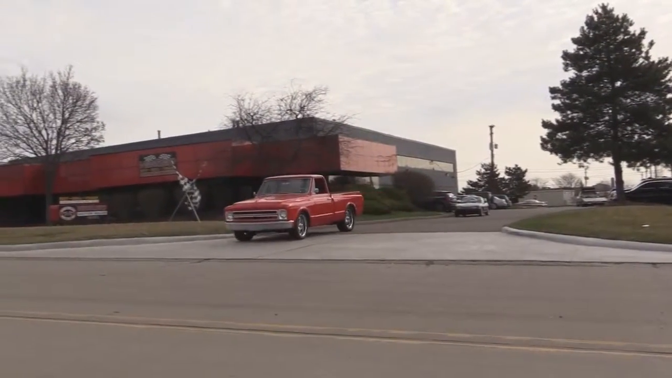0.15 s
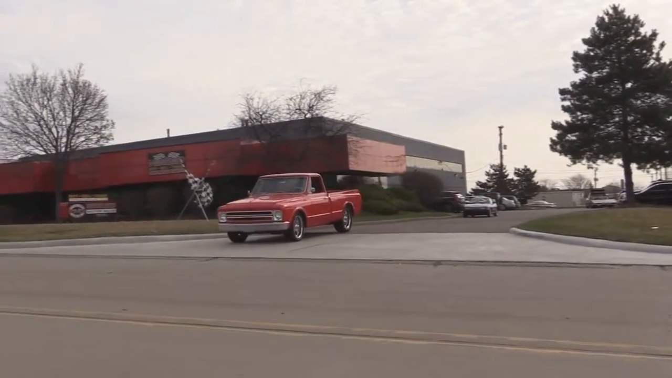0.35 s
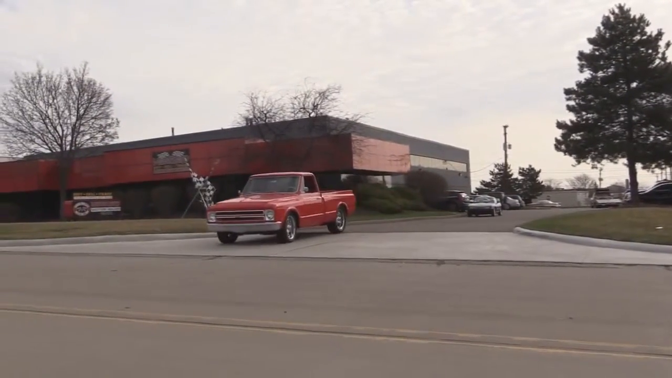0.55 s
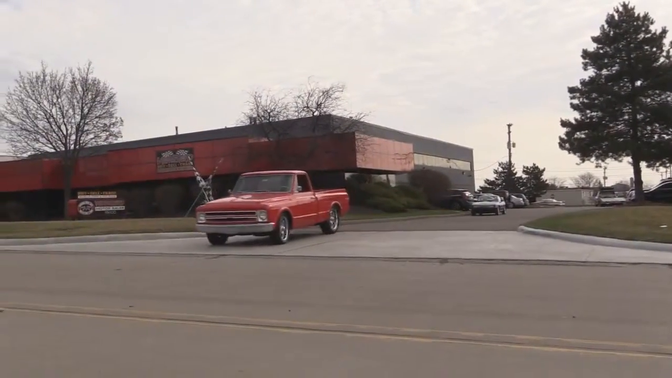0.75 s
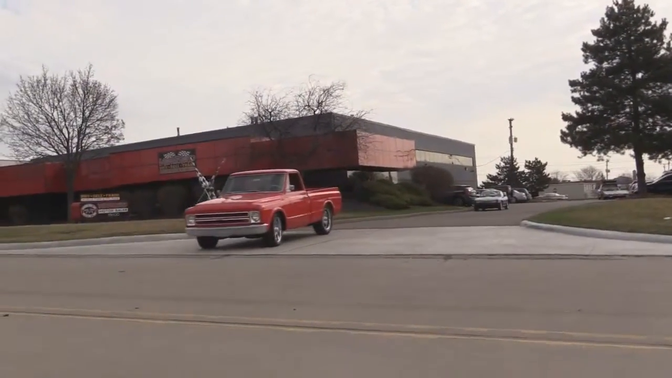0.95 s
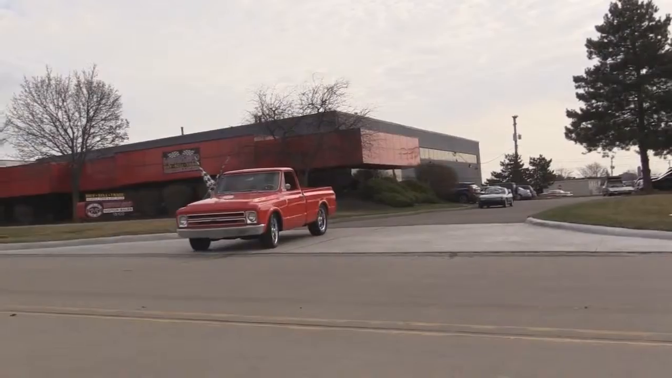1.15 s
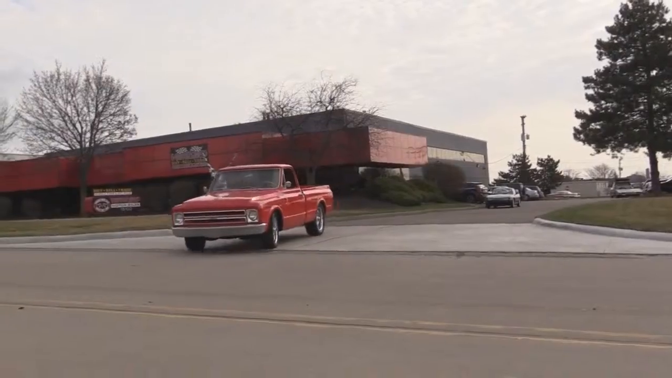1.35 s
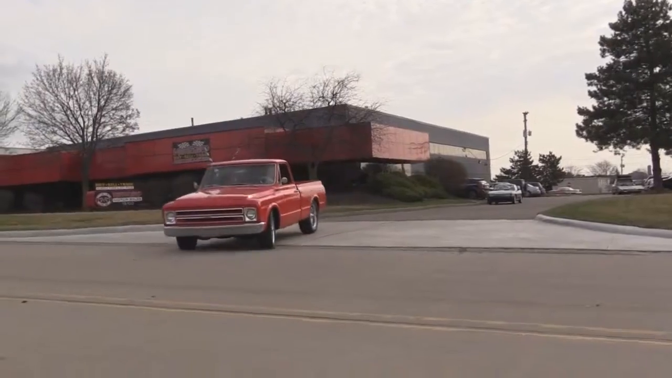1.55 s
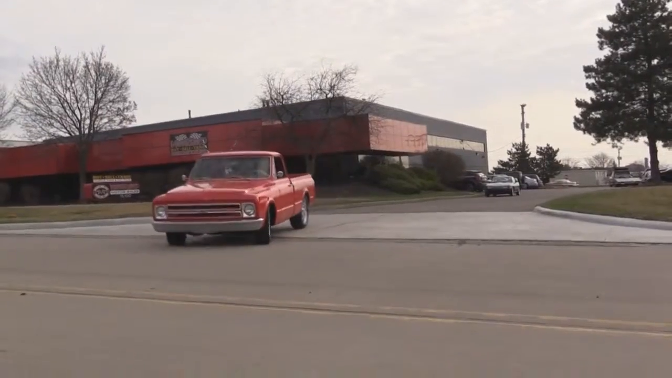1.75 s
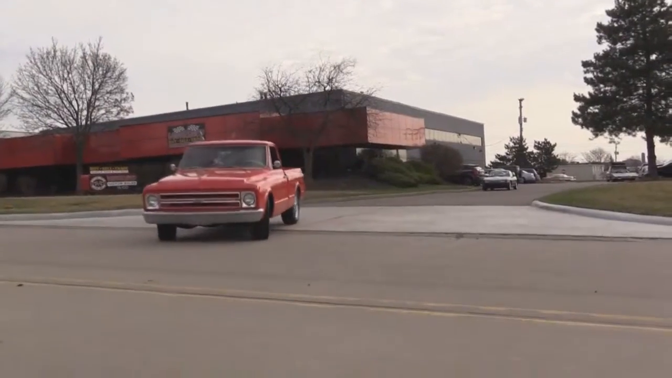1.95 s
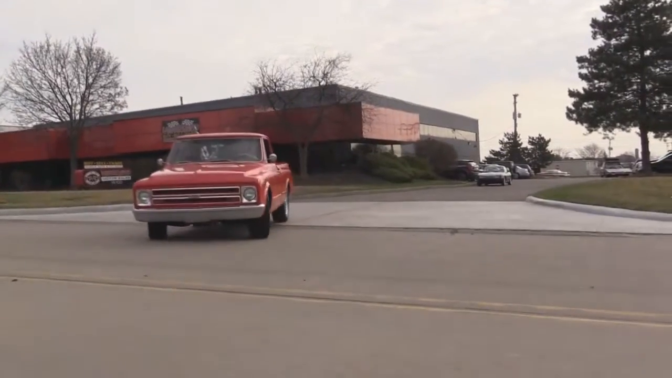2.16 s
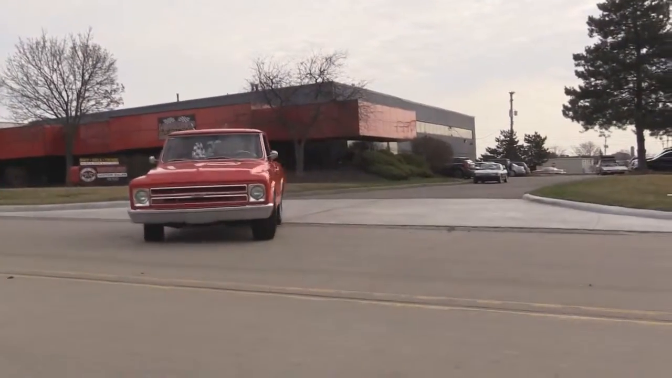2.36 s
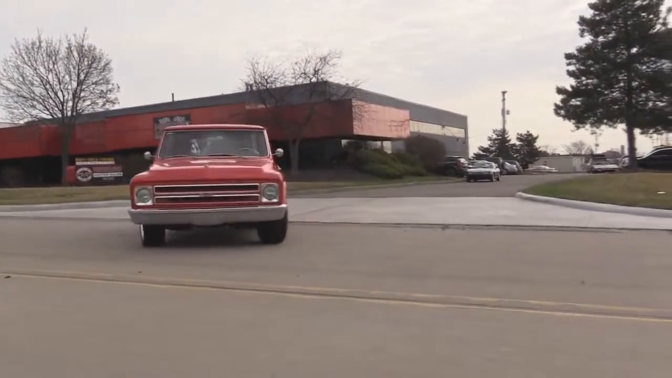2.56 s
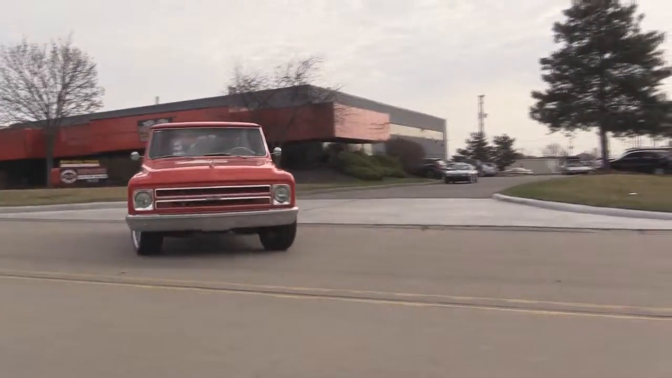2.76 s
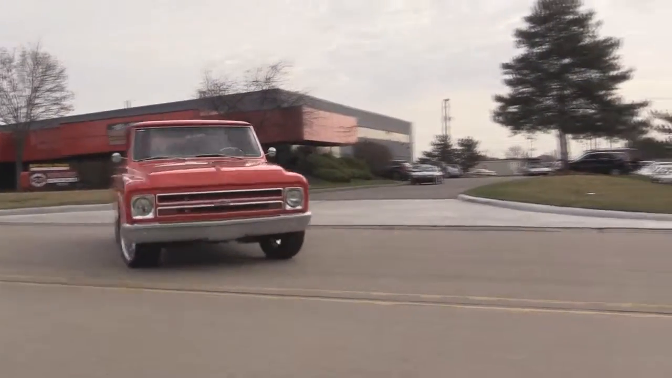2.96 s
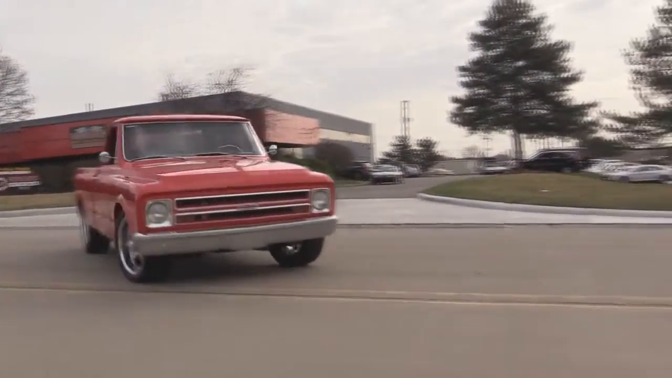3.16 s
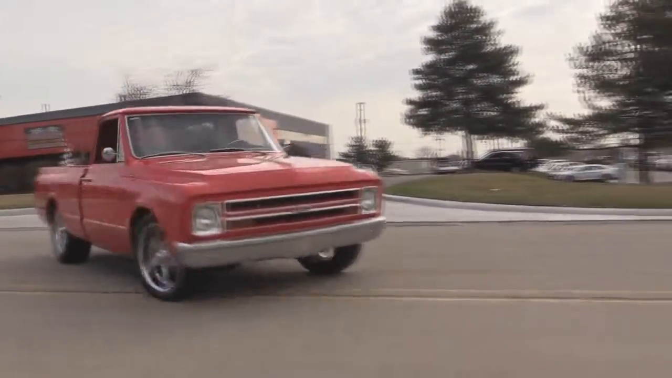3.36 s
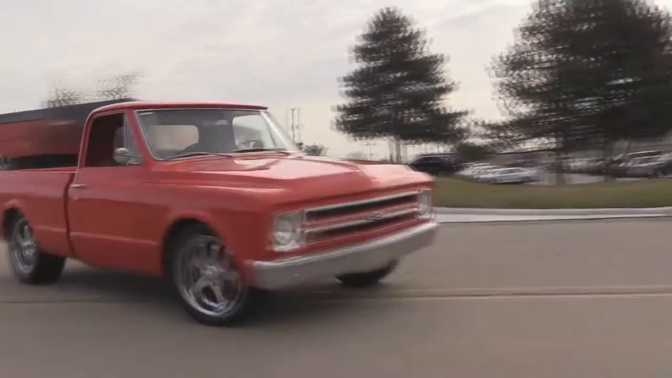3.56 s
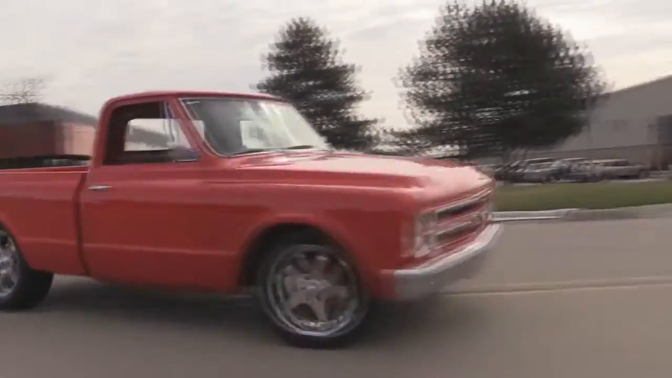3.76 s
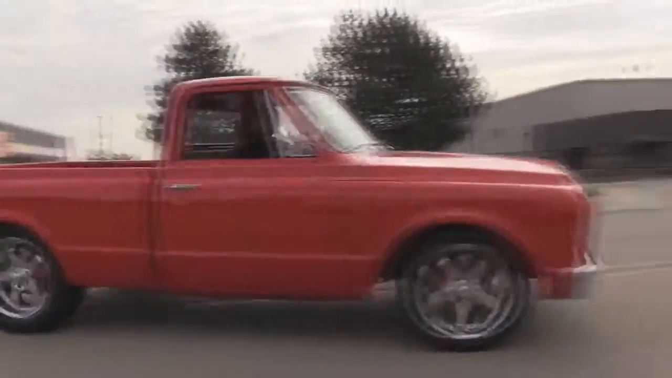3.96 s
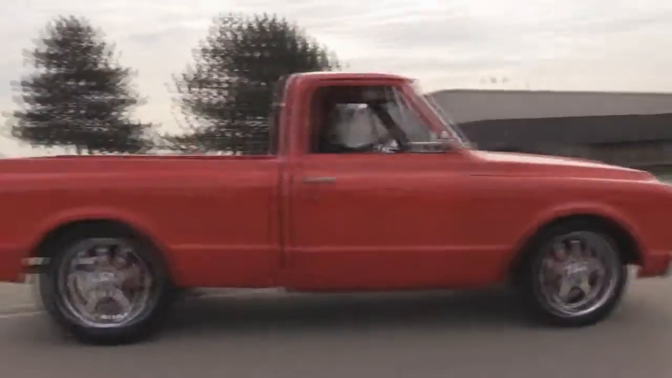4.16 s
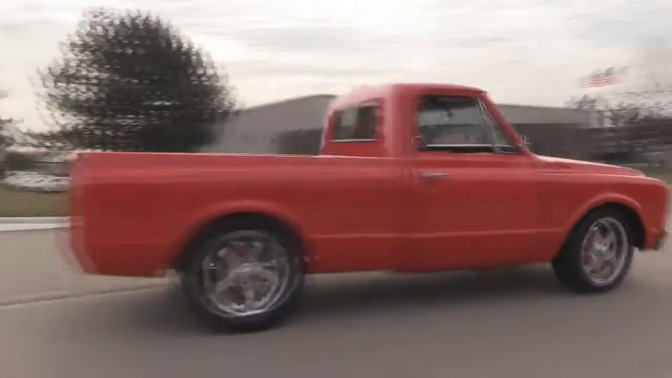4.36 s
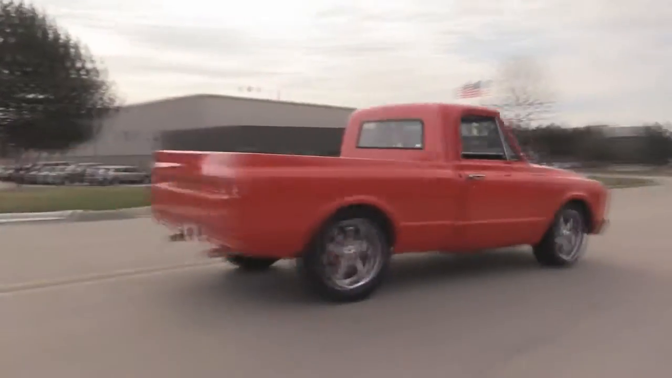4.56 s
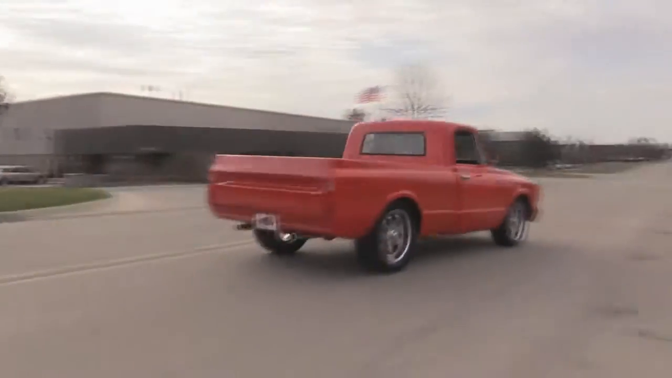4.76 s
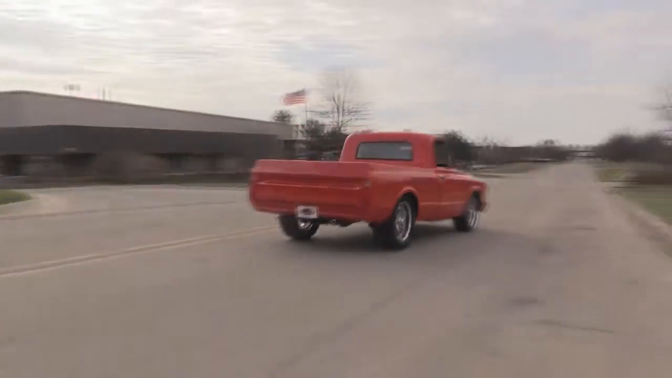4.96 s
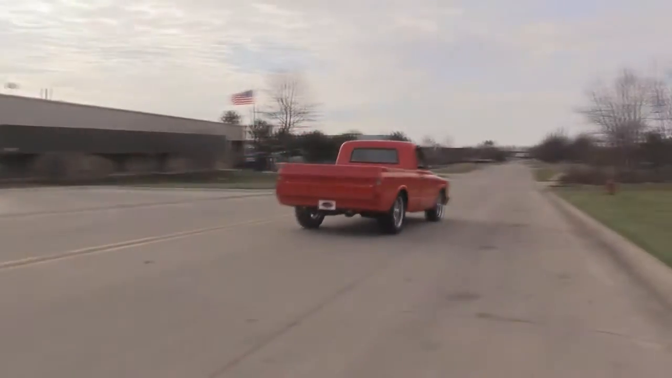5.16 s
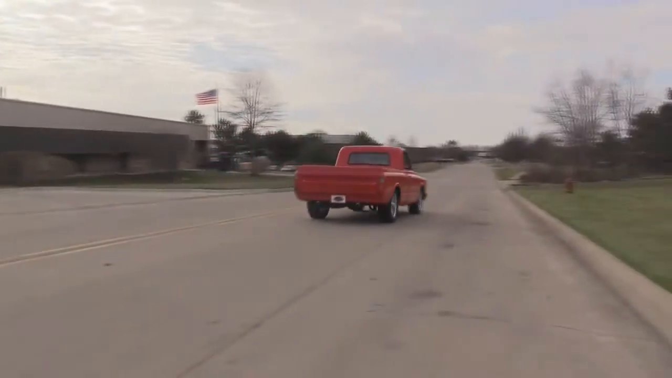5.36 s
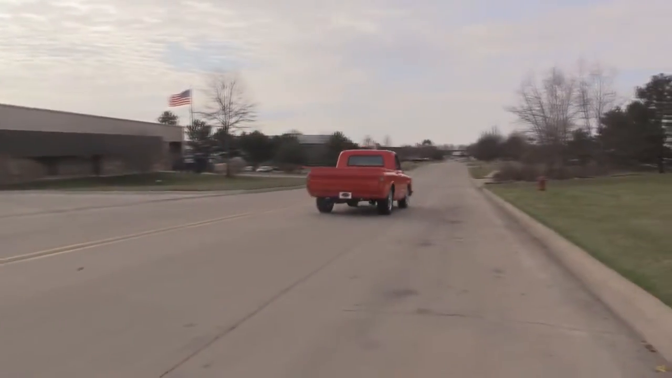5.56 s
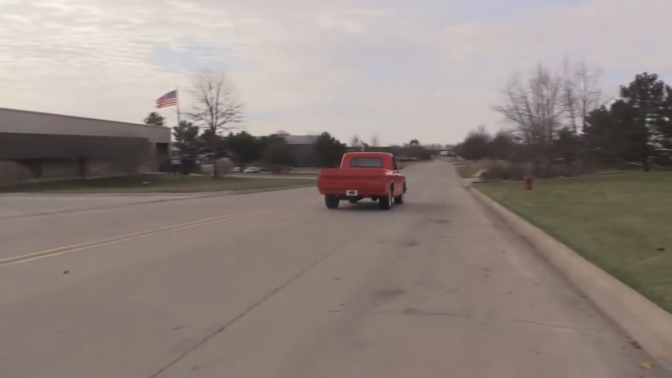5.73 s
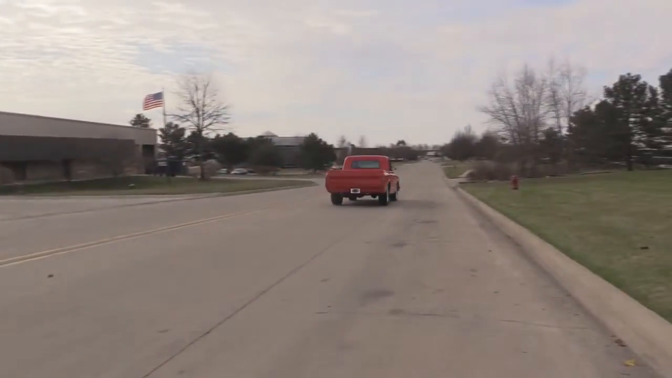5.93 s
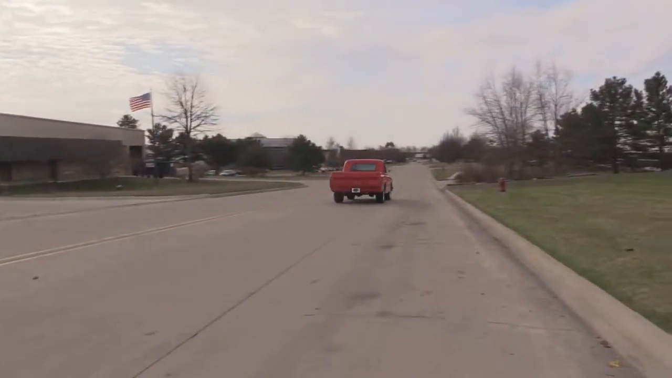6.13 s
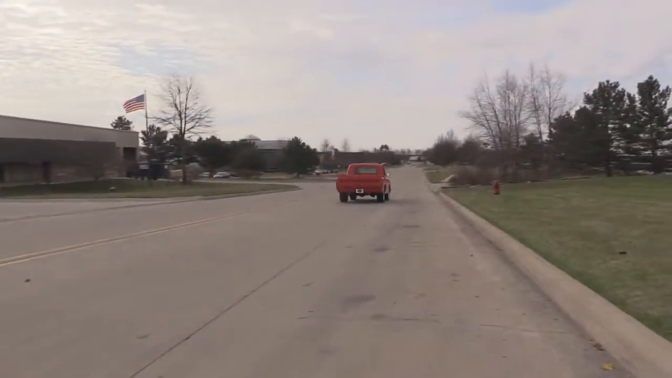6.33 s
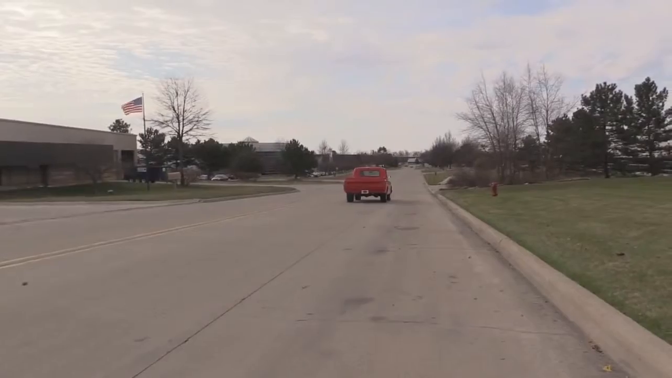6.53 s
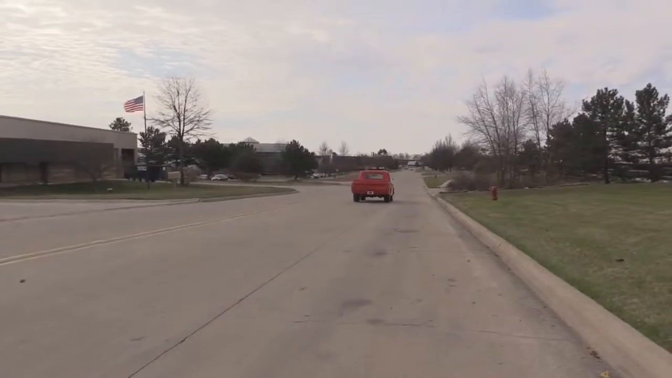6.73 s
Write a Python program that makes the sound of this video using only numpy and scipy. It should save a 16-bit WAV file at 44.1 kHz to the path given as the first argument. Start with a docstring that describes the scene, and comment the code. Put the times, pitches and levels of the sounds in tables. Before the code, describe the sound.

Outdoors beside a wide road, an old V8 pickup rolls out quietly with a low, uneven burble under light wind. The throttle opens, the exhaust deepens and grows, then the engine climbs sharply as the truck sweeps close past the fixed roadside microphone. Rasp and hiss burst from the dual pipes, the pitch drops at an upshift with dry crackles, and the throaty drone recedes down the road.

```python
"""At the edge of a driveway: an old V8 pickup rolls out, opens up, kicks down as it passes, shifts up and leaves.
Its exhaust is a set of notes that follow the engine, mixed with uneven strokes and puffs of noise from two pipes.
Short bursts, ringing pipe tips and single cracks make the rasp; filtered noise makes the rush, hiss and intake.
Sine waves make the whine of the belt-driven parts and a distant bird; low noise makes wind and a faint town.
Engine load, distance and the angle of the pipes set how loud the main voices are."""
import sys
import numpy as np
from scipy import signal
from scipy.fft import rfft, irfft
from scipy.io import wavfile
from scipy.ndimage import uniform_filter1d

SR = 44100
rng = np.random.default_rng(int(sys.argv[2]) if len(sys.argv) > 2 else 0)


def transcribe(signal):
    """Save signal, clipped to [-1, 1], as a 16-bit WAV file at the path in sys.argv[1]."""
    frames = np.atleast_2d(signal).T
    limited = np.clip(frames, -1, 1)
    pcm = np.round(limited * 32767).astype(np.int16)
    wavfile.write(sys.argv[1], SR, pcm)


N = 303839
TIME = np.arange(N) / SR   # seconds

# engine speed: creeping, a blip, kick-down, upshift, easing off: (time [s], speed [firings per s])
ENGINE_SPEED = [(0.0, 103.5), (0.46, 103.6), (0.85, 111.1), (1.25, 115.9), (1.6, 119.0), (1.85, 118.9),
                (2.2, 119.6), (2.34, 130.8), (2.48, 108.8), (2.65, 112.2), (2.97, 111.9), (3.3, 119.8),
                (3.58, 124.7), (3.75, 144.4), (3.95, 147.4), (4.2, 157.0), (4.45, 167.4), (4.69, 176.5),
                (4.9, 178.6), (5.02, 160.1), (5.13, 142.6), (5.35, 135.5), (5.8, 138.8), (6.29, 142.1),
                (6.5, 138.7), (6.7, 132.9), (6.89, 131.4)]
# engine load: (time [s], share of full load [0-1])
ENGINE_LOAD = [(0, 0), (.98, 0.13), (2.25, 0.21), (2.5, 0.58), (3.05, 0.67), (3.52, 0.75), (3.7, 0.88),
               (4.83, 0.95), (5.09, 0.85), (5.41, 0.79), (6.38, 0.7), (6.55, 0.66), (6.89, 0.63)]
# tailpipe of each cylinder in firing order: 0 near, 1 far
PIPE_OF_CYLINDER = [0, 1, 1, 0, 1, 0, 0, 1]
# cylinders in firing order: (strength before the unevenness factor [dB], lateness [firing intervals])
CYLINDERS = [(3.9, 0.0076), (5.3, 0.12), (10.3, .02), (6.2, -0.048), (2.5, -0.11), (10.2, -.05),
             (3.3, -.02), (1.8, 0)]
UNEVEN_IDLE, UNEVEN_PER_LOAD = 0.7, 1   # the cylinders differ more under load

# the truck gathers speed evenly along a straight path past the microphone
PASS_S, PASS_M, PASS_M_PER_S, ACCEL_M_PER_S2 = 4.614, 4.52, 4.31, 1
PIPE_SPACING_M, SOUND_M_PER_S = 0.76, 343
# the tailpipes swing round toward the listener: (start [s], end [s])
PIPES_TURN_S = [4.34, 5.28]
# loudness of each voice, by name: (abreast at full load [dB], gain from no load to full [dB],
# loss per doubling of distance [dB], gain from behind [dB], narrowness of the rearward beam [power, sign ignored])
VOICES = { "boom": (-22.5, 26, 1, 4.5, 3), "bark": (-29.5, 23.5, 5, 5.5, 0.5),
          "blat": (-40.5, 25.5, 4, 10.5, 1), "rush": (-35, 29.5, 3.5, 2.1, -21),
          "rasp": (-41, 25.5, 8.5, 11, 0.5), "hiss": (-38, 24.5, 12.5, 3.5, 0.5),
          "rumble": (-34.5, 22, 14, 8, 8)}

# exhaust notes: (pitch [cycles per eight firings], from the front [dB], from the side [dB], from behind [dB])
EXHAUST_NOTES = [(3, 5, 8, 3), (4, 0, 3, -4), (5, 7, 10, 1), (6, 0, -7, -10), (7, -3, -1, -11),
                 (8, 12, 5, 8), (9, 2, 1, 5.5), (10, 1, -8, -1), (11, 1, 7, 2), (12, -8, 3, -11),
                 (13, -3, 14, 3), (14, -12, 8, -6), (15, -6, 8, 3), (16, -2, 10, 0), (17, -1, 0, 7),
                 (18, -8, 4, 5), (19, -9, 8, 7), (20, -9, 8, 4), (21, -3, 4, 9), (22, -5, 1, -2),
                 (23, -5, 1, -3), (24, -6, 5, 1), (25, -11, 4, 1), (26, -13, 5, 4), (27, -11, 3, 1),
                 (28, -12, 0, 9), (29, -10, -2, 2), (30, -7, -2, 4), (31, -7, -4, 0), (32, -5, -1, -2),
                 (33, -10, 1, -1), (34, -7, 4, 1), (35, -9, 2, -1), (36, -7, -3, -1), (37, -7, 5, 0),
                 (38, -5, 6, 7), (39, -10, 4, -1), (40, -7, 0, -1)]
# change of balance with the throttle nearly shut: (pitch [cycles per eight firings], gain [dB])
IDLE_NOTES = [(4, 6), (9, -3), (10, -11), (11, -7), (12, 4), (14, 3), (15, -4), (16, 5), (17, -5), (20, 2),
              (25, 7), (26, 6), (27, 4)]
# that balance fades as the throttle opens: (start [s], end [s])
THROTTLE_OPENS_S = [2.23, 2.7]
PASSING_ROUGHNESS = 0.44   # the notes waver by this share more as the pipes sweep past
# resonances that the notes glide through: (frequency [Hz], gain [dB])
PIPE_RESONANCES = [(30.0, -19), (55.0, -2.5), (80.0, -7.5), (100.0, -4), (115.0, 11), (135.0, 9.5),
                   (165.0, -4.5), (200.0, -4.5), (230.0, -6.5), (260.0, -4), (300.0, -14.5), (345.0, -17.5),
                   (400.0, -9), (450.0, -27.5), (510.0, -15.5), (580.0, -20.5), (650.0, -17),
                   (800.0, -33.5)]
# colour of the muffler: (frequency [Hz], relative level [dB])
MUFFLER_COLOUR = [(30, -36), (55, 4), (80, 0), (100, 4), (120, 1), (140, 2), (165, -16), (200, -9.5),
                  (260, -14.5), (330, -18), (400, -32), (460, -23), (650, -24.5), (1100, -38)]
# boom, which drops out as the throttle snaps open: (time [s], gain [dB])
BOOM_LEVEL = [(0, 1), (1.5, -1), (2.33, 0.5), (2.45, -11), (2.58, 1), (3.42, -0.7), (3.51, -3), (3.6, 1.5),
              (3.95, -1.5), (4.4, 0.5), (4.9, 0), (5.3, -1), (6.1, -0.6), (6.89, 0)]
# bark, which hollows twice: (time [s], gain [dB])
BARK_LEVEL = [(.4, -5.5), (1.6, 4), (2.3, 0.5), (2.9, -3.5), (3.5, 2.5), (4.8, -0.5), (5.4, 1.5), (6.0, -3),
              (6.7, 4)]
# burble of uneven strokes: (time [s], level [dB])
BURBLE_LEVEL = [(0, -55), (.9, -47), (1.6, -47), (2.35, -51.5), (2.6, -36.5), (3.1, -33), (3.5, -39.5),
                (4.1, -62)]
BLAT_SHADE_DB = -31   # gain if the truck's body shaded the blat completely

# colour of the rush of fan and tyres: (frequency [Hz], relative level [dB])
RUSH_COLOUR = [(300, 8), (600, 7), (900, 5.5), (1300, 0), (1800, -3.5), (2400, -4.5), (4000, -19.5)]
# colour of the rasp from behind: (frequency [Hz], relative level [dB])
RASP_BEHIND_COLOUR = [(1000, -68), (1700, -24.5), (2150, -6), (2520, -3.5), (2950, -7), (3420, -51),
                      (3800, -39), (4940, -39), (8360, -120)]
# colour of the rasp from the side: (frequency [Hz], relative level [dB])
RASP_SIDE_COLOUR = [(1600, -15), (1850, -11), (2080, -2.5), (2350, -7), (2750, 5), (3000, -1), (3250, -8),
                    (3550, -0.5), (4000, -26)]
# the rasp takes on the colour of the pipes seen side-on: (start [s], end [s])
RASP_SIDE_TURN_S = [4.17, 4.6]
# the rasp swells and sags as the truck passes and leaves: (time [s], gain [dB])
RASP_SWELL = [(3.2, -1.5), (4.25, -0.5), (4.75, -0.5), (5.12, -2), (5.3, -0.5), (5.65, 0.5), (5.95, -5),
              (6.38, -0.5), (6.6, -3.5)]
# colour of the hiss from the front: (frequency [Hz], relative level [dB])
HISS_FRONT_COLOUR = [(1880, -28.5), (3200, -16), (3700, -3), (4430, -1.5), (5150, -2), (5730, -6.5),
                     (6540, -3), (7720, -7.5), (11700, -7), (13700, -11), (15600, -16.5)]
# colour of the hiss from the pipes: (frequency [Hz], relative level [dB])
HISS_BEHIND_COLOUR = [(1880, -14), (3200, -0.5), (3490, 0), (3980, -3.5), (4500, -4), (5540, -10),
                      (6330, -4), (7220, -10), (10900, -14), (14200, -22.5), (15600, -35)]
# the front's bright hiss gives way to that of the pipes: (start [s], end [s])
HISS_TURN_S = [4.23, 5.17]
# the hiss holds up, then drops as the driver eases off: (time [s], gain [dB])
HISS_SWELL = [(5.5, 0), (6.05, 1), (6.4, 0.5), (6.55, -3)]
PUFF_FAR, PUFF_ABREAST = .08, 0.82   # share of the hiss that comes in puffs
# jets of gas from the pipes: (time [s], strength [factor])
GAS_JETS = [(4.55, 0), (4.75, 0.83), (5, 1), (5.15, 0.15), (5.3, 0.33)]
# ring of the pipe tips: (frequency [Hz], relative level [dB], time to fall 60 dB [s])
TIP_MODES = [(2250, -17, .012), (2500, -12.5, .014), (2780, -9.5, .015), (3020, -10, .012)]
# bounce off the road: (time [s], lag [s], share [factor])
ROAD_BOUNCE = [(4.6, .00068, 0), (5.02, .00053, .35), (5.1, .00048, .42), (5.28, .00036, .45),
               (5.45, .00034, .2)]
# sharp cracks in the tailpipes: (time [s], level before the shared gain and envelope [dB], ring before its sag [Hz])
CRACKS = [(5.0594, -26, 2420), (5.0958, -29, 2640), (5.1442, -23, 2570), (5.1687, -31, 2600),
          (5.2071, -27.5, 2370), (5.25, -23, 2400), (5.2644, -21.5, 2560), (5.285, -17.5, 3000),
          (5.307, -23, 2850), (5.3224, -23, 2800), (5.343, -24, 2760), (5.3647, -26, 2500),
          (5.3895, -27, 2630), (5.4014, -19, 3000), (5.462, -25, 2550), (5.4993, -27, 2810),
          (5.5183, -26, 2920), (5.5795, -37, 2650), (5.636, -22, 2540), (5.6805, -31, 2900),
          (5.694, -29, 2630), (5.7518, -30, 2260), (5.7748, -34, 2770), (5.7962, -28, 2960),
          (5.8087, -24.5, 2940), (5.9244, -35, 2240), (6.0256, -35, 3080), (6.14, -37, 2850),
          (6.1966, -39, 3030), (6.209, -30, 2860), (6.2647, -27.5, 2470), (6.3654, -32, 2670),
          (6.3794, -24.5, 2670), (6.72, -42, 2680)]

# intake as the throttle opens: (time [s], level [dB])
INTAKE_LEVEL = [(2.3, -94), (2.52, -56), (2.8, -55.5), (3.05, -56), (3.35, -48), (3.6, -48), (4.2, -41.5),
                (4.5, -43.5), (4.9, -40.5), (5.2, -79)]
# intake resonances: (frequency [Hz], width [Hz], head-on [dB], turning [dB], abreast [dB])
INTAKE_MODES = [(1017, 130, -9, 2, -3.5), (1276, 110, -16, -2, -14), (1465, 53, -10, -15, -2),
                (2000, 190, 2.5, -12, 3), (2520, 200, -7.5, -14, 2), (4440, 150, -7.5, -17, -3.5)]
# when those three views come: (head-on [s], turning [s], abreast [s])
INTAKE_VIEW_S = [2.9, 3.23, 4.06]
# whine of the belt-driven parts: (time [s], level [dB])
WHINE_LEVEL = [(2.9, -100), (3.3, -59), (3.55, -51), (3.75, -43.5), (4.5, -45.5), (4.9, -41.5), (5.15, -62),
               (6.3, -46), (6.89, -53)]
# whine tones: (pitch [cycles per firing], relative level [dB], gain from behind [dB])
WHINE_TONES = [(5.52, 0, 0), (8.25, -7, -12), (10.25, -9, -7)]
# a sharp tick, perhaps grit thrown by a tyre: (time [s], level before the noise band [dB])
TICKS = [(5.6108, -38)]

# colour of wind and of the truck's low rumble: (frequency [Hz], relative level [dB])
WIND_COLOUR = [(8.2, -36), (14, -18), (27, -2.5), (40, -4), (57, -4.5), (75, -35), (85, -6.5), (110, -32),
               (190, -120)]
# gusts on the microphone: (time [s], length [s], level [dB])
GUSTS = [(0.13, 0.34, -41), (0.68, 0.36, -37), (1.007, 0.11, -34.5), (2.543, 0.55, -41),
         (3.052, 0.39, -40.5), (3.745, 0.22, -35), (4.256, 0.15, -32)]
BREEZE_DB = -51.5
# colour of the distant town: (frequency [Hz], relative level [dB])
TOWN_COLOUR = [(88, -32), (150, -10.5), (179, -9), (263, -10.5), (428, -27.5), (607, -19.5), (695, -30.5),
               (966, -25), (1290, -35), (2180, -40), (3690, -57), (11800, -84), (15500, -57)]
TOWN_DB = -55
# distant bird: (time [s], start pitch [Hz], end pitch [Hz], length [s], level [dB])
CHIRPS = [(0.188, 2490, 2050, 0.043, -66), (.86, 2290, 2450, .08, -69)]
CUTOFF_HZ = 15550


def from_db(db):
    """Turn decibels into a gain."""
    return 10 ** (np.asarray(db) / 20)


def in_time(rows):
    """Join the points of a timed table with straight lines, one control per column."""
    s, *columns = np.transpose(rows)
    return [np.interp(TIME, s, column) for column in columns]


def rms_one(x):
    """Scale a sound to an average (rms) level of 1."""
    return x / np.sqrt(np.mean(x ** 2) + 1e-20)


def band(x, low_hz, high_hz):
    """Keep only the sound between two frequencies, with steep edges."""
    return signal.sosfilt(signal.butter(4, [low_hz, high_hz], "band", fs=SR, output="sos"), x)


def steady(x):
    """Hold the level near rms 1 over a few engine cycles, keeping the throb."""
    size = SR // 7
    power = uniform_filter1d(uniform_filter1d(x * x, size), size)
    return x / np.sqrt(np.abs(power) + 1e-20)


def colour(x, spectrum):
    """Filter to the given spectrum without any sound coming early (minimum phase)."""
    size = 16384
    hz, db = np.transpose(spectrum)
    octaves = np.log2(np.maximum(np.arange(size // 2 + 1) * SR / size, 1))
    outside = np.abs(octaves - np.clip(octaves, np.log2(hz[0]), np.log2(hz[-1])))
    # beyond the table the level falls 24 dB per octave, for three octaves
    level_db = np.interp(octaves, np.log2(hz), db) - 24 * np.minimum(outside, 3)
    cepstrum = irfft(np.log(from_db(level_db)))
    # folding the cepstrum forward puts all of the response after its start
    cepstrum[1:size // 2] *= 2
    cepstrum[size // 2 + 1:] = 0
    response = irfft(np.exp(rfft(cepstrum)))
    return signal.fftconvolve(x, response)[:N]


def noise():
    """White noise: every frequency equally strong."""
    return rng.standard_normal(N)


def path():
    """Distance to the truck [m], how squarely it is abreast [0-1], how far it is seen from behind [0-1]."""
    since_s = TIME - PASS_S
    along_m = PASS_M_PER_S * since_s + .5 * ACCEL_M_PER_S2 * since_s ** 2
    metres = np.hypot(PASS_M, along_m)
    behind = np.interp(TIME, PIPES_TURN_S, [0, 1])
    return metres, PASS_M / metres, behind


def loudness(voice):
    """A voice grows with load, falls with distance and changes as the tailpipes come into view."""
    full_db, load_db, distance_db, behind_db, beam = VOICES[voice]
    load, = in_time(ENGINE_LOAD)
    _, abreast, behind = path()
    db = full_db + load_db * (load - 1)
    db = db + distance_db * np.log2(abreast)
    return from_db(db + behind_db * behind ** abs(beam))


def firings(count, lag_s, uneven, scatter_db, jitter_ms):
    """A click for every exhaust stroke; those from the far pipe arrive later."""
    n = np.arange(int(count[-1]))
    chance = rng.standard_normal((len(n), 2))
    cylinder = n % len(CYLINDERS)
    strength_db, late = np.array(CYLINDERS)[cylinder].T
    at_s = np.interp(n + late, count, TIME)
    size_db = strength_db + scatter_db * chance[:, 0]
    size = from_db(size_db * np.interp(at_s, TIME, uneven))
    pipe_delay_s = np.array(PIPE_OF_CYLINDER)[cylinder] * np.interp(at_s, TIME, lag_s)
    at_s = at_s + pipe_delay_s + jitter_ms * chance[:, 1] / 1000
    samples = np.clip(np.round(at_s * SR).astype(int), 0, N - 1)
    return np.bincount(samples, size, N)


def puffs(clicks, rise_s, decay_s):
    """Gas flow that swells at each stroke and dies away, held near rms 1."""
    rise, decay = np.exp(-1 / (np.array([rise_s, decay_s]) * SR))
    return steady(signal.lfilter([1], [1, -rise - decay, rise * decay], clicks + 1e-18))


def notes(count, per_s):
    """Notes tied to the engine cycle glide through the pipes' resonances, each wavering."""
    s, knots = TIME[::400], TIME[::3000]   # coarse times for the gains and the wavering
    side = np.interp(s, [3.6, 4.3], [0, 1])
    rear = np.interp(s, [4.95, 5.2], [0, 1])
    idling = np.interp(s, THROTTLE_OPENS_S, [1, 0])
    cycle_hz = np.interp(s, TIME, per_s) / 8   # one cycle is eight firings
    angle = 2 * np.pi * (count - 3.9) / 8
    waver_depth = 1 + PASSING_ROUGHNESS * (side - rear)
    idle_db = dict(IDLE_NOTES)
    out = 0
    for order, front_db, side_db, rear_db in EXHAUST_NOTES:
        db = (1 - side) * front_db + (side - rear) * side_db + rear * rear_db
        db = db + np.interp(order * cycle_hz, *np.transpose(PIPE_RESONANCES))
        db = db + idling * idle_db.get(order, 0)
        swell, wander = .065 * np.sqrt(order) * rng.standard_normal((2, len(knots)))
        # notes near the firing rate stay in step, so they swell together once a cycle
        wander = wander + .9 * max(abs(order - 8) - 1, 0) * rng.standard_normal()
        gain = from_db(db) * (1 + waver_depth * np.interp(s, knots, swell))
        out = out + np.interp(TIME, s, gain) * np.cos(order * angle + np.interp(TIME, knots, wander))
    return out


def tailpipe(x, pipe_hz, reflection):
    """Waves bounce between muffler and open end: resonances at multiples of the pipe's pitch."""
    share = np.clip(reflection, 0, .8)
    return sum(share ** k * np.interp(TIME - k / pipe_hz, TIME, x, left=0) for k in range(5))


def exhaust(clicks, count, per_s, flow, bark_rough, blat_rough):
    """Low boom and burble, mid bark and higher blat mix notes, pressure pulses and turbulent gas."""
    boom_db, = in_time(BOOM_LEVEL)
    bark_db, = in_time(BARK_LEVEL)
    burble_db, = in_time(BURBLE_LEVEL)
    tone = notes(count, per_s)
    strokes = tailpipe(colour(clicks, MUFFLER_COLOUR), pipe_hz=131.0, reflection=0.35)
    turbulence = tailpipe(colour(noise() * flow, MUFFLER_COLOUR), pipe_hz=127.9, reflection=0.56)

    boom = loudness("boom") * from_db(boom_db) * steady(band(tone, 39.7, 183.6))
    burble = from_db(burble_db) * steady(band(clicks * noise() + 1e-12, 118.4, 141.7))

    bark = steady(band(tone, 194.2, 472))
    bark = bark + bark_rough * steady(band(turbulence, 155, 453))
    bark = loudness("bark") * from_db(bark_db) * steady(bark)

    blat = 1.34 * steady(band(tone, 450, 970))
    blat = blat + steady(band(strokes, 582, 1010))
    blat = blat + blat_rough * steady(band(turbulence, 398, 1220))
    # while the truck faces the listener its body shades the blat
    in_view = np.interp(TIME, [2.2, 3.45, 3.95], [.35, .14, 1])
    blat = loudness("blat") * from_db(BLAT_SHADE_DB * (1 - in_view)) * steady(blat)
    return boom + burble + bark + blat


def ring_tips(at, level_db, scatter_db):
    """Pressure fronts at the given samples strike every mode of the tips with a strength of its own."""
    out = np.zeros(N)
    for hz, mode_db, t60_s in TIP_MODES:
        strike_db = level_db + mode_db + rng.normal(0, scatter_db, len(at))
        strikes = np.bincount(at, from_db(strike_db), N)
        r = from_db(-60 / (t60_s * SR))   # what is left of the ring after one sample
        w = 2 * np.pi * hz / SR
        out += signal.lfilter([0, np.sin(w)], [1, -2 * r * np.cos(w), r * r], strikes + 1e-18)
    return band(out, 1950, 3250)


def crackle(clicks, spread_db):
    """Strokes of very uneven force ring the pipe tips as shocks, held near rms 1."""
    at = np.flatnonzero(clicks)
    size_db = spread_db * np.minimum(rng.exponential(1, len(at)), 3)
    return steady(ring_tips(at, size_db, scatter_db=4) + 1e-9)


def road_echo(x, dull_hz):
    """The road bounce follows ever more closely as the truck leaves, so its notches sweep upward."""
    lag_s, share = in_time(ROAD_BOUNCE)
    bounce = signal.sosfilt(signal.butter(2, dull_hz, fs=SR, output="sos"), x)
    return x + share * np.interp(TIME - lag_s, TIME, bounce)


def rushing(clicks, flow, puff_share, clear_m, dull_db_per_m):
    """Noise of fan and tyres rushes on approach; gas leaving the pipes rasps and hisses stroke by stroke."""
    metres, _, behind = path()
    share = np.clip(puff_share, 0, 1)
    gate = 1 - share + share * flow
    rush = steady(colour(noise() * np.sqrt(gate), RUSH_COLOUR))

    # the fourth power lets the strongest strokes spit the most gas
    jet_strength, = in_time(GAS_JETS)
    spurts = jet_strength * puffs(clicks ** 4, rise_s=.005, decay_s=.007)
    jet = noise() * (gate ** .7 + spurts)
    # every stroke tears at the pipe's lip in a short burst
    tears = puffs(clicks, rise_s=.0004, decay_s=.003)
    bursts = noise() * (.9 * gate + .6 * spurts + .35 * tears)

    rasp_behind = steady(colour(bursts, RASP_BEHIND_COLOUR))
    rasp_behind = steady(rasp_behind + .8 * crackle(clicks, spread_db=1.3))
    beside = np.interp(TIME, RASP_SIDE_TURN_S, [0, 1])
    rasp_front = steady(band(noise() * gate, 1730, 3360))
    rasp_side = steady(colour(bursts, RASP_SIDE_COLOUR))
    rasp_ahead = (1 - beside) * rasp_front + beside * rasp_side
    rasp = behind * rasp_behind + (1 - behind) * rasp_ahead

    turned = np.interp(TIME, HISS_TURN_S, [0, 1])
    hiss = (1 - turned) * steady(colour(jet, HISS_FRONT_COLOUR))
    hiss = hiss + turned * steady(colour(jet, HISS_BEHIND_COLOUR))
    # the top fades as the truck recedes
    dull = signal.sosfilt(signal.butter(1, 4000, fs=SR, output="sos"), hiss)
    top_db = -dull_db_per_m * behind * np.maximum(metres - clear_m, 0)
    hiss = dull + from_db(top_db) * (hiss - dull)
    hiss = signal.sosfilt(signal.butter(4, 3700, "high", fs=SR, output="sos"), hiss)

    rasp_db, = in_time(RASP_SWELL)
    hiss_db, = in_time(HISS_SWELL)
    treble = loudness("rasp") * from_db(rasp_db) * steady(rasp)
    treble = treble + loudness("hiss") * from_db(hiss_db) * steady(hiss)
    return loudness("rush") * rush + road_echo(treble, dull_hz=9000)


def wind():
    """A light breeze with bell-shaped gusts, and the low rumble that travels with the truck."""
    power = from_db(BREEZE_DB) ** 2 + loudness("rumble") ** 2
    for s, length_s, db in GUSTS:
        power = power + from_db(db) ** 2 * np.exp(-(2 * (TIME - s) / length_s) ** 2)
    return np.sqrt(power) * steady(colour(noise(), WIND_COLOUR))


def town():
    """The faint murmur of a distant town, made from steady filtered noise."""
    return from_db(TOWN_DB) * rms_one(colour(noise(), TOWN_COLOUR))


def bird():
    """Short chirps from far away, each a sine wave that glides in pitch."""
    out = np.zeros(N)
    for s, start_hz, end_hz, length_s, db in CHIRPS:
        progress = np.clip((TIME - s) / length_s, 0, 1)
        turns = np.cumsum(start_hz + (end_hz - start_hz) * progress) / SR
        out += from_db(db) * np.sin(np.pi * progress) * np.sin(2 * np.pi * turns)
    return out


def intake():
    """Air drawn through the carburettor rings the air cleaner and engine bay, changing as the truck turns."""
    level_db, = in_time(INTAKE_LEVEL)
    air = 0
    for hz, width_hz, *view_db in INTAKE_MODES:
        resonance = signal.iirpeak(hz, hz / width_hz, fs=SR)
        ringing = rms_one(signal.lfilter(*resonance, noise()))
        air = air + from_db(np.interp(TIME, INTAKE_VIEW_S, view_db)) * ringing
    return from_db(level_db) * steady(air)


def whine(count, waver_depth):
    """Belt-driven parts sing in step with the crankshaft, each wavering in strength and pitch."""
    level_db, = in_time(WHINE_LEVEL)
    _, _, behind = path()
    out = 0
    for per_firing, db, behind_db in WHINE_TONES:
        waver = 1 + waver_depth * rms_one(band(noise(), 4.8, 34.0))
        wobble = 0.86 * rms_one(band(noise(), 2.2, 17.3))   # radians
        tone = np.sin(2 * np.pi * per_firing * count + wobble)
        out = out + from_db(db + behind_db * behind) * waver * tone
    return from_db(level_db) * out


def cracks(gain_db, rise_s, decay_s, sag_share, sag_s, tail_db, tail_s, snap_db, snap_s):
    """The hardest pressure fronts stand out: a snap, then a ring that sags in pitch as it dies."""
    out, t = np.zeros(N), TIME[:SR // 20]
    envelope = np.exp(-t / decay_s) + from_db(tail_db) * np.exp(-t / tail_s)
    envelope = envelope * (1 - np.exp(-t / rise_s))
    turns = np.cumsum(1 + sag_share * (np.exp(-t / sag_s) - .7)) / SR
    for s, db, hz in CRACKS:
        start = int(s * SR)
        burst = rng.standard_normal(len(t)) * np.exp(-t / snap_s)
        snap = from_db(snap_db) * band(burst, 1400, 3300)
        ring = envelope * np.sin(2 * np.pi * hz * turns)
        out[start:start + len(t)] += from_db(db + gain_db) * (ring + snap)
    return out


def ticks(decay_s):
    """A bright burst of noise that dies at once."""
    envelope = 0
    for s, db in TICKS:
        envelope = envelope + from_db(db) * (TIME >= s) * np.exp(-np.abs(TIME - s) / decay_s)
    return envelope * band(noise(), 6000, 15500)


def scene():
    """Add up the truck, the wind, the distant town and the bird."""
    per_s, = in_time(ENGINE_SPEED)
    load, = in_time(ENGINE_LOAD)
    _, abreast, _ = path()
    count = np.cumsum(per_s) / SR   # firings so far
    # seen from the side, one tailpipe lies behind the other and is heard later
    lag_s = abreast * PIPE_SPACING_M / SOUND_M_PER_S
    uneven = UNEVEN_IDLE + UNEVEN_PER_LOAD * load
    clicks = firings(count, lag_s, uneven, scatter_db=.9, jitter_ms=.06)
    flow = puffs(clicks, rise_s=0.0018, decay_s=0.019)
    puff_share = PUFF_FAR + (PUFF_ABREAST - PUFF_FAR) * abreast ** 3

    truck = exhaust(clicks, count, per_s, flow, bark_rough=.22, blat_rough=.45)
    truck = truck + rushing(clicks, flow, puff_share, clear_m=5.1, dull_db_per_m=2.0)
    truck = truck + intake() + whine(count, waver_depth=0.61)
    truck = truck + cracks(gain_db=2.0, rise_s=0.00048, decay_s=0.0013, sag_share=.22, sag_s=0.0053,
                           tail_db=-12.5, tail_s=0.0063, snap_db=-11, snap_s=0.00076)
    truck = truck + ticks(decay_s=0.0024)
    return (truck + wind() + town() + bird())[None]


def record(dry):
    """Ease the sound in and out over 8 ms and cut the top steeply."""
    to_edge_s = np.minimum(TIME, TIME[-1] - TIME)
    eased = dry * np.minimum(to_edge_s / .008, 1) ** 2
    return signal.sosfilt(signal.ellip(10, .1, 80, CUTOFF_HZ, fs=SR, output="sos"), eased)


dry = scene()
out = record(dry)
transcribe(out)
```